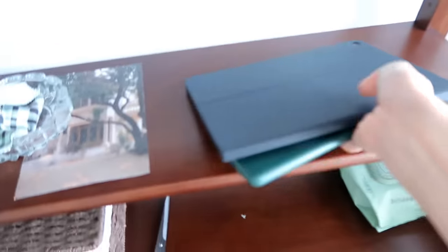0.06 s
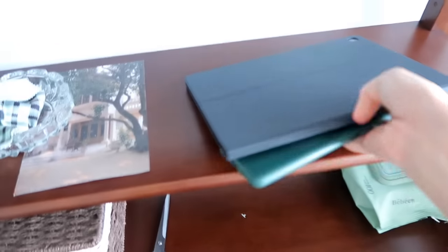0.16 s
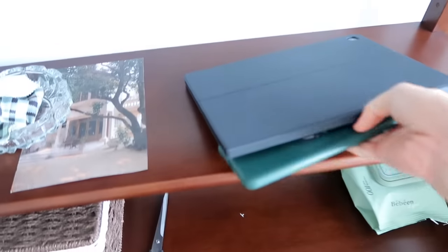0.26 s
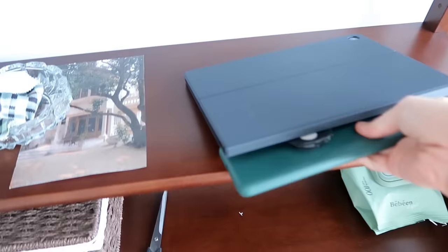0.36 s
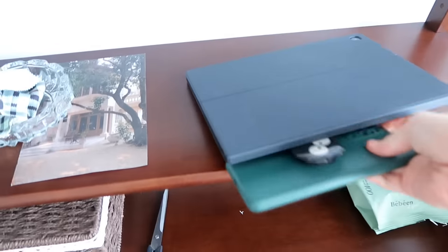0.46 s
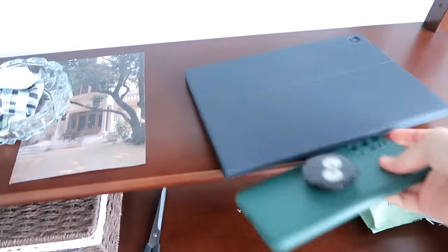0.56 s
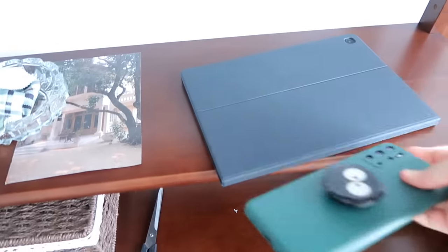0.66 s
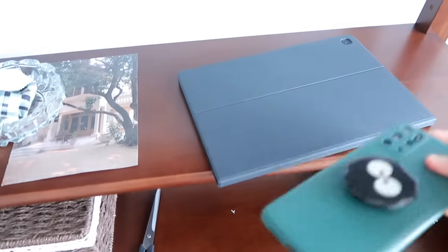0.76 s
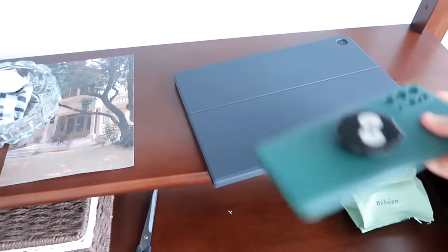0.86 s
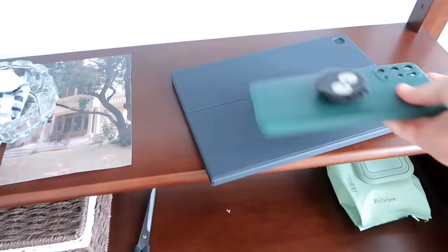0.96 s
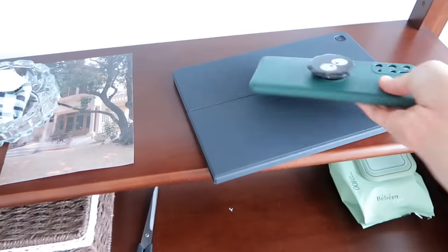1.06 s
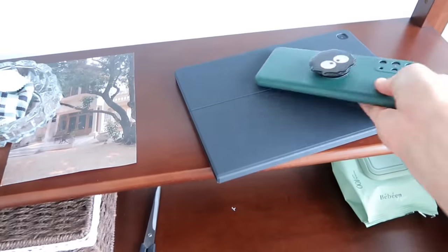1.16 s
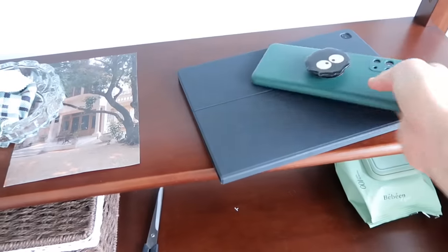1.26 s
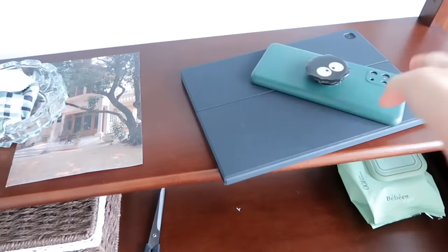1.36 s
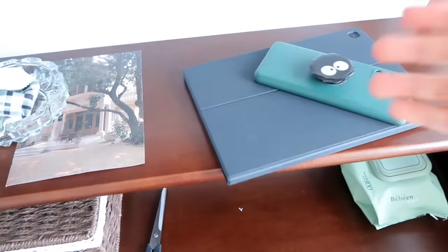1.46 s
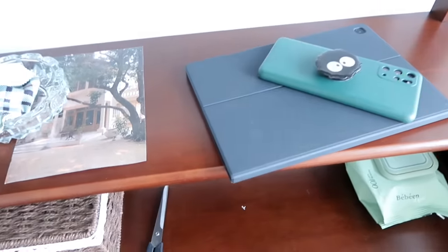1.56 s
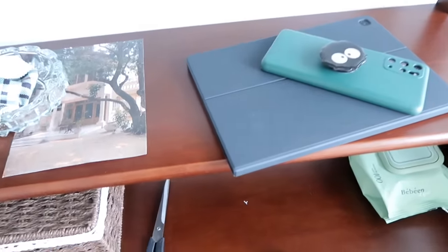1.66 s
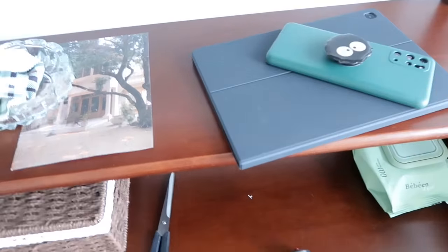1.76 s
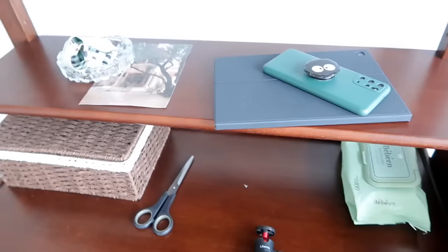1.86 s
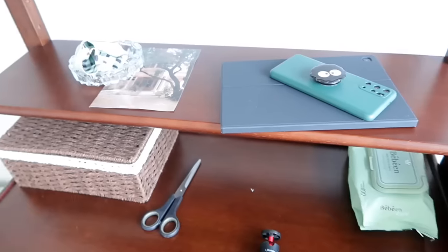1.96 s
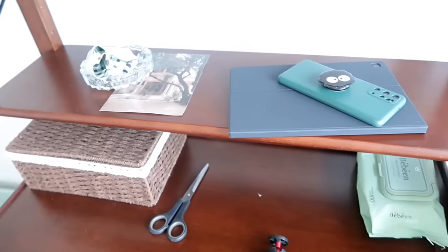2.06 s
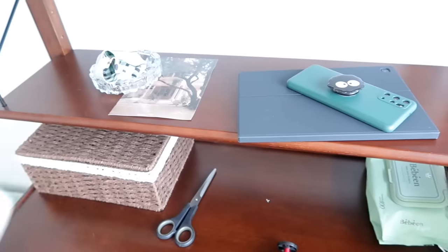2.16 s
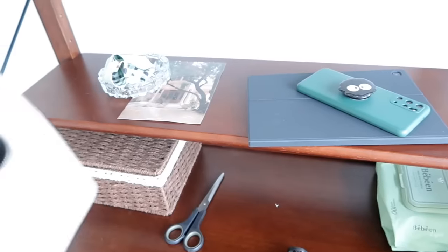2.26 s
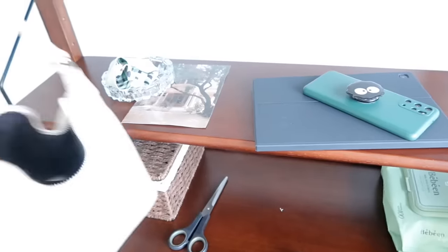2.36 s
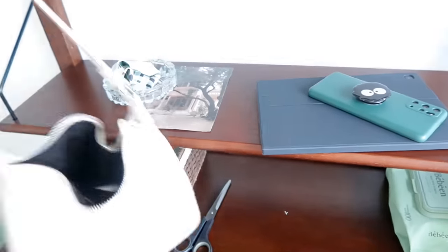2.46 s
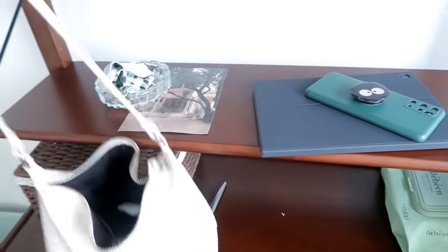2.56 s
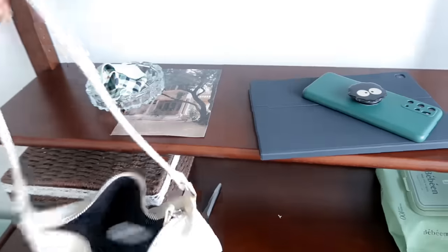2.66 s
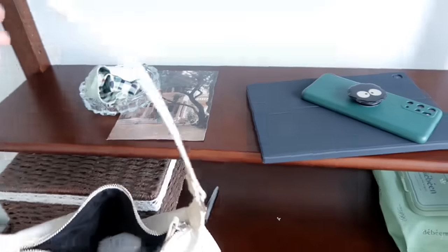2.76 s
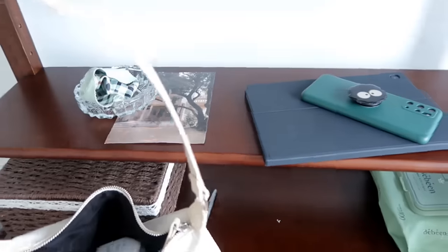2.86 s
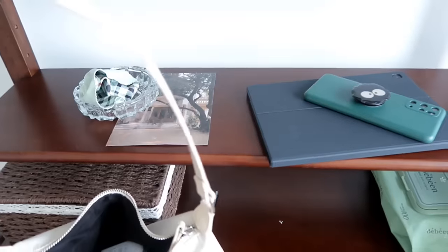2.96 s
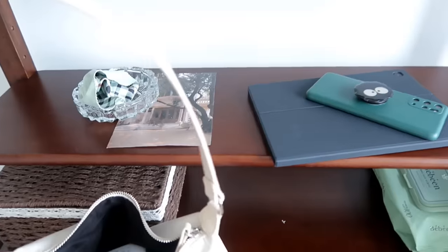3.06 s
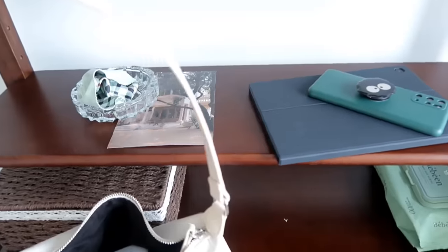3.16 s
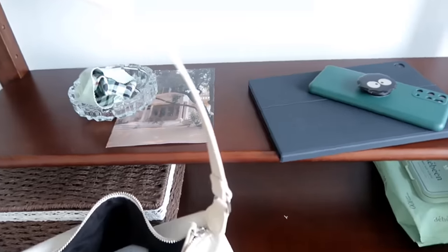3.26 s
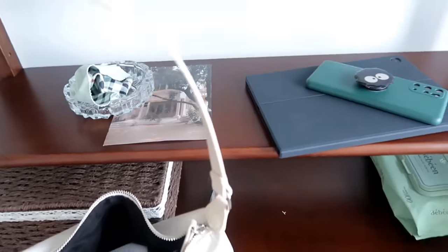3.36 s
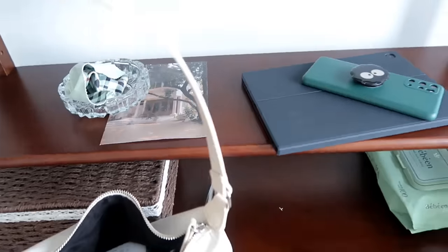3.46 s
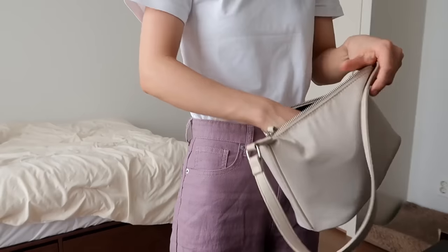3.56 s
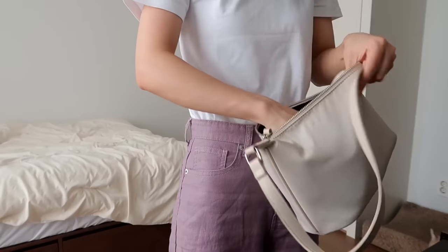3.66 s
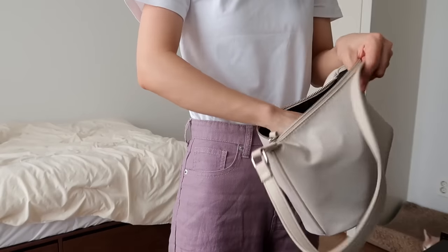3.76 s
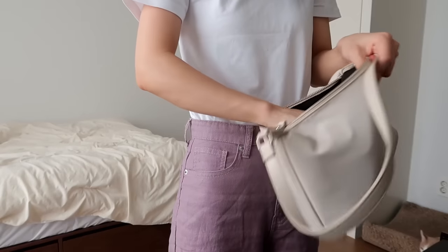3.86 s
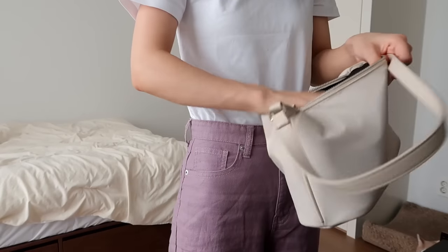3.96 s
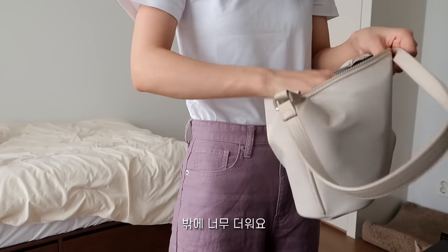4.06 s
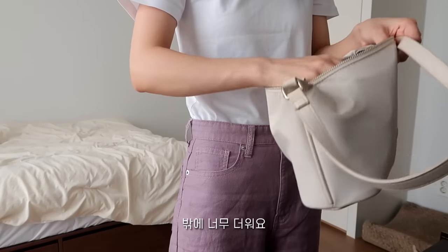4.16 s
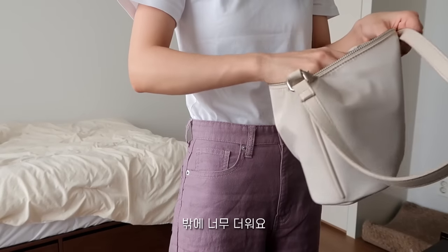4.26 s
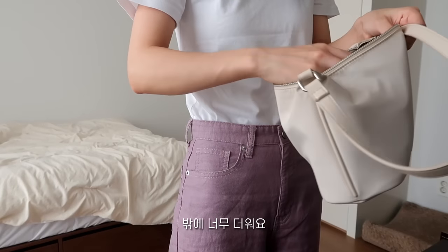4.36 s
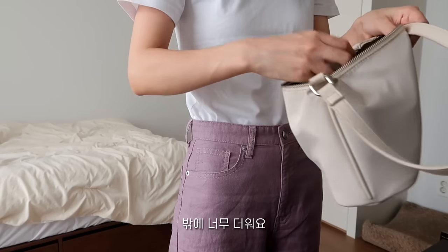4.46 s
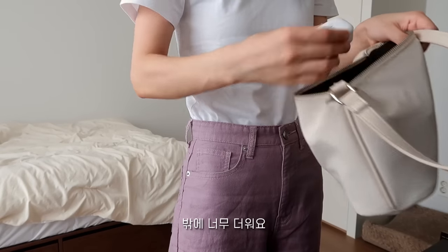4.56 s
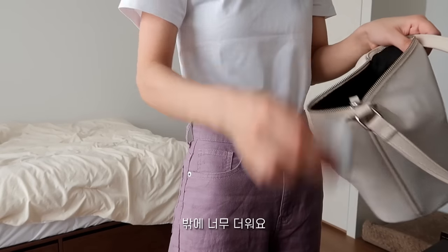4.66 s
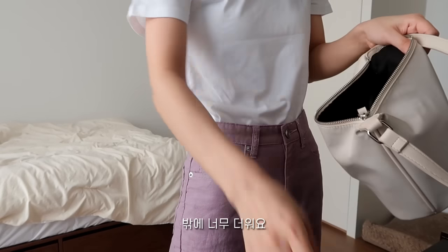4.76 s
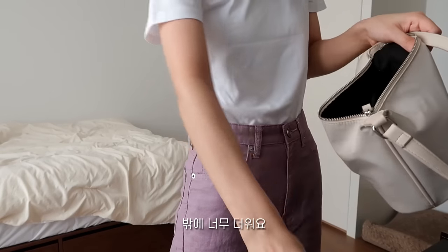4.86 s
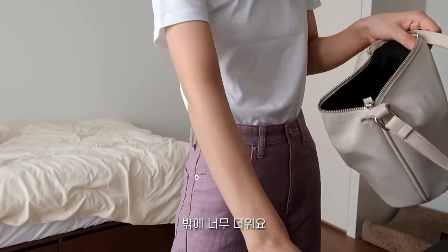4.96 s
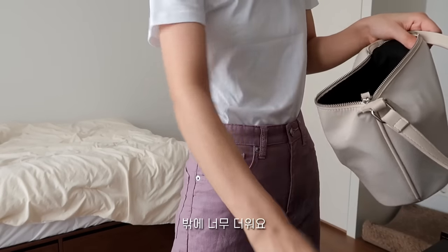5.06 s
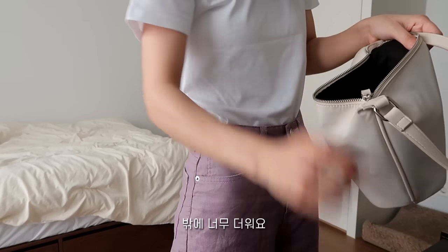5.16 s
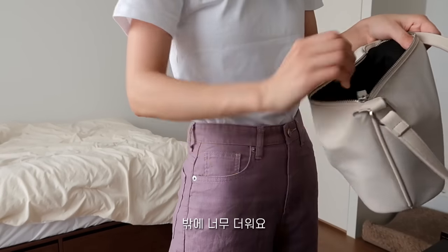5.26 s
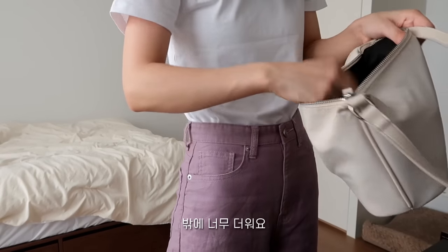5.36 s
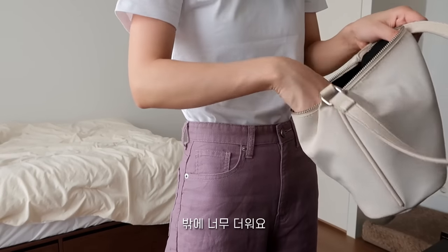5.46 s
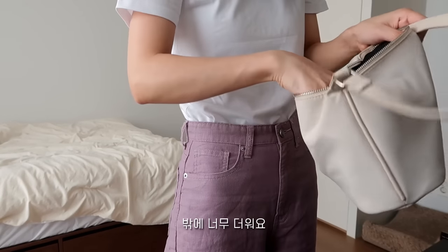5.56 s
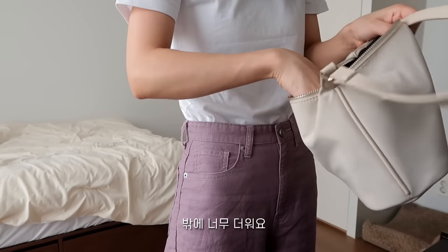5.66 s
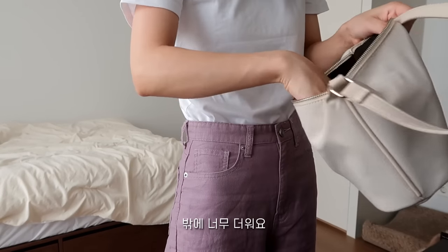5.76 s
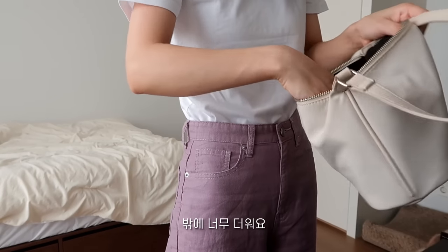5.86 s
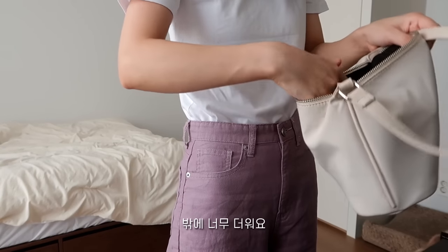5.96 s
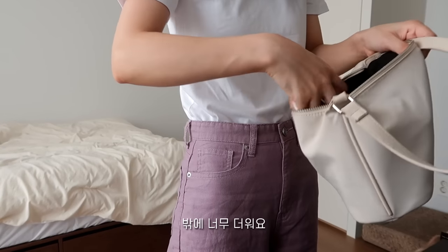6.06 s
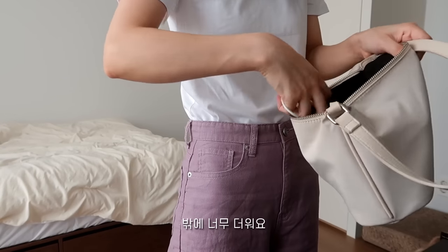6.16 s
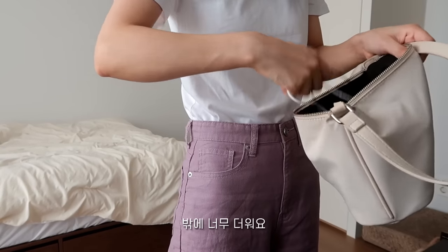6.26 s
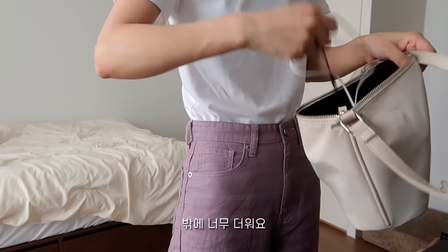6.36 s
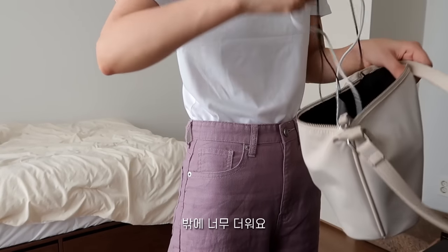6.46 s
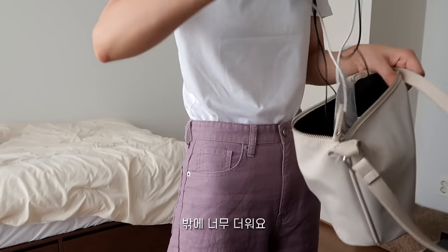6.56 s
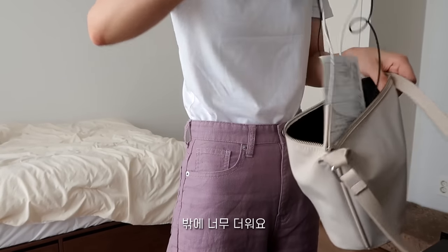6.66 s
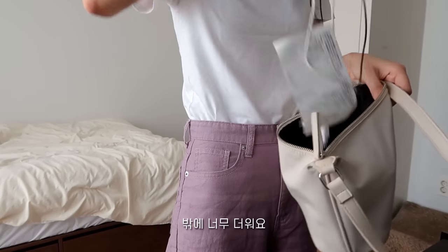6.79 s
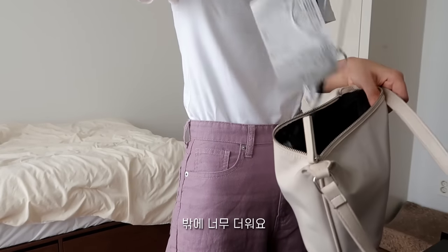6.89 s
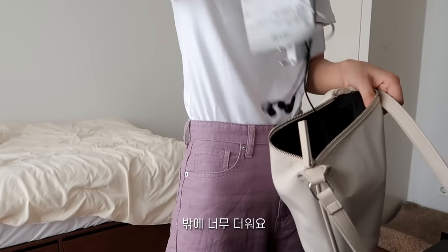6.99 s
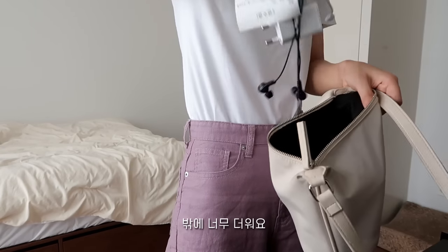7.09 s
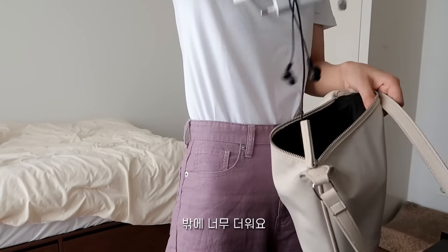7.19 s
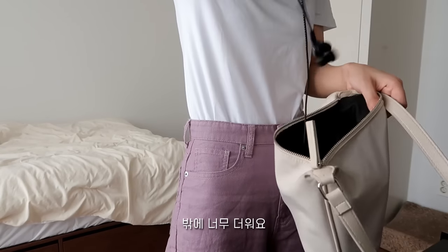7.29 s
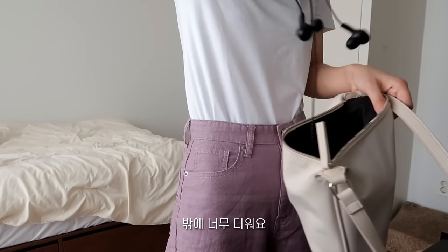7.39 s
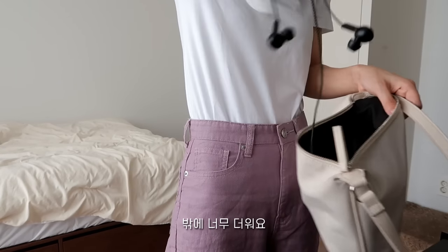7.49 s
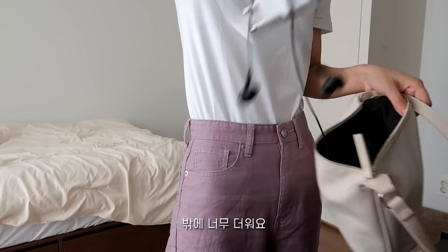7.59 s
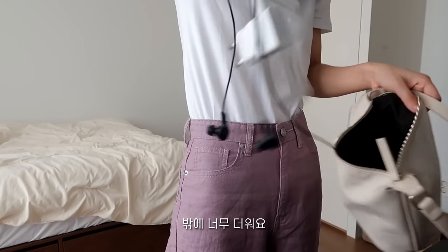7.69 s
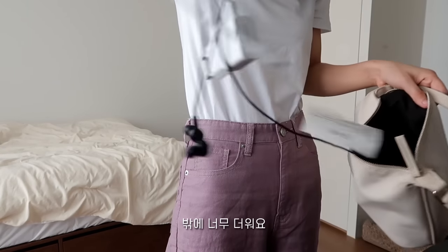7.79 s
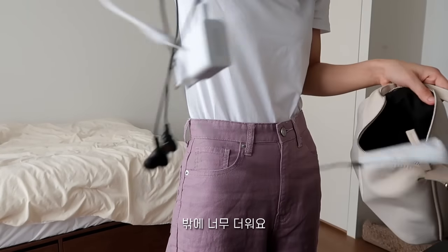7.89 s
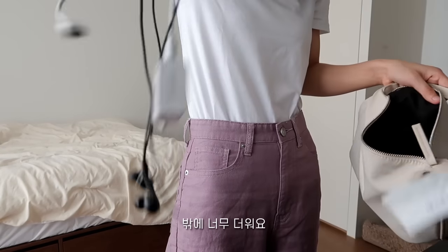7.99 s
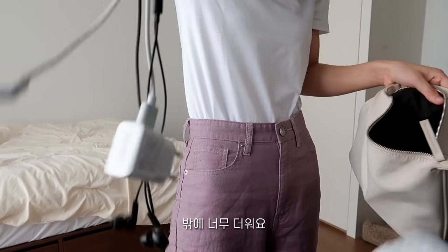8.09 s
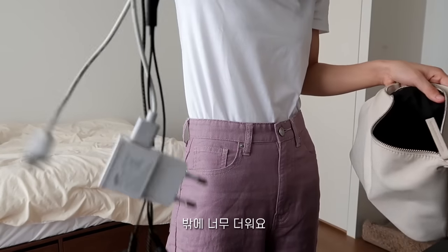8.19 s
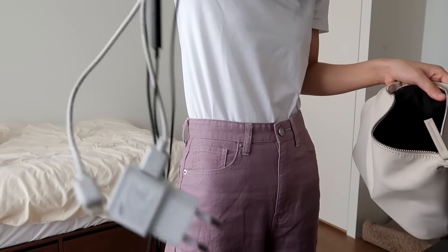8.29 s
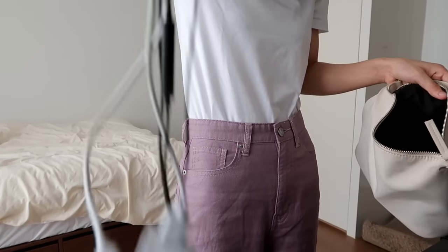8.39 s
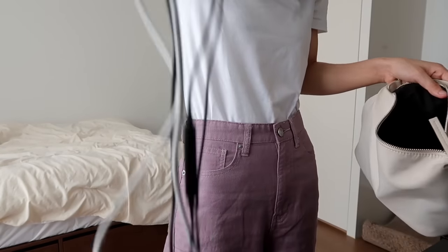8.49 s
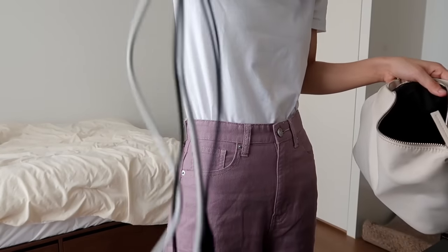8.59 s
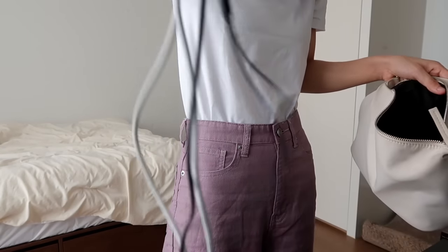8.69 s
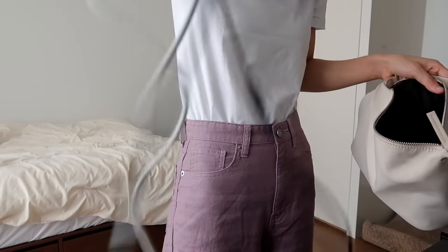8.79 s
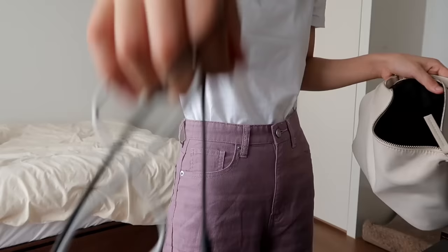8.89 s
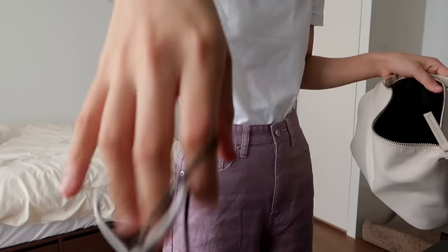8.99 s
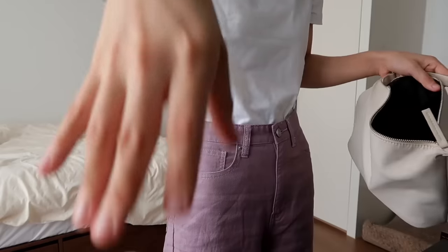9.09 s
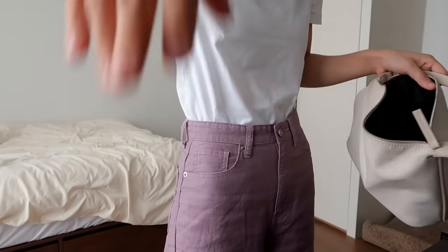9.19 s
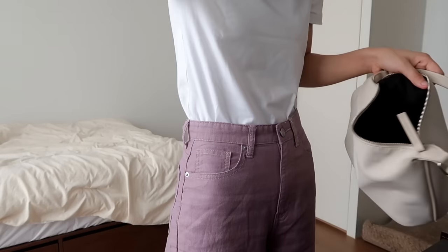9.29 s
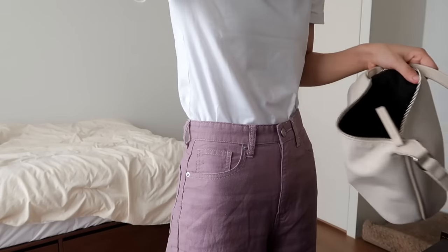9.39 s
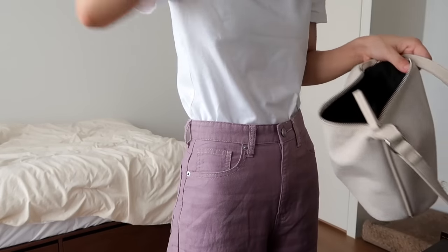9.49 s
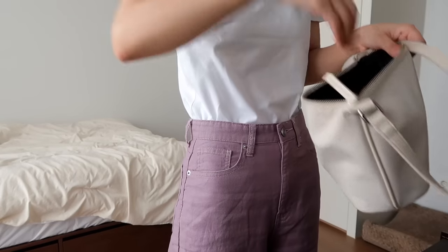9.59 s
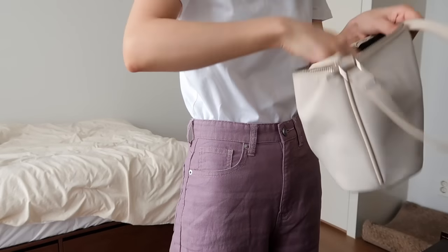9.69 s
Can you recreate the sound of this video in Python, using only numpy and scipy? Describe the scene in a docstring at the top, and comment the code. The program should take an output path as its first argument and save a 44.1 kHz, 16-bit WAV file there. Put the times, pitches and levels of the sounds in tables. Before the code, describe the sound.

Soft room hush with short, dry reflections. First a faint bump, a quick squeak and a tumbling knock on a hollow wooden shelf, then a second solid knock. A bag bumps and rustles with sparse small ticks inside. Cables crunch and scrape as they are pulled out, and hard plastic plugs clack loudly near the microphones, with dense knocks and drags toward the end.

```python
"""A quiet, small furnished bedroom, heard at a phone's two microphone ports over a low hush and a thin whine.
A phone case squeaks by stick-slip from under a tablet, which drops on a wooden shelf. Things knock on the shelf,
tick in a cloth bag, and plastic chargers on cables clack: each blow sums damped modes, ring, snap and crack.
Cloth and cables rustle as band noise in grains, scrapes sing in gliding resonances, and decaying noise
convolved with the near sounds gives the room's answer."""
import sys
import numpy as np
from scipy import signal
from scipy.fft import rfft, irfft
from scipy.io import wavfile
from scipy.ndimage import uniform_filter1d, map_coordinates

SR = 44100
rng = np.random.default_rng(int(sys.argv[2]) if len(sys.argv) > 2 else 0)


def transcribe(u):
    """Save the signal u as a 16-bit wav file named by the first command-line argument.

    u: samples, shape (n,) or (channels, n), limited to [-1, 1]; the rate is SR.
    q: integer samples, one column per channel.
    """
    v = np.clip(np.atleast_2d(u).T, -1, 1)
    q = np.round(v * 32767).astype(np.int16)
    wavfile.write(sys.argv[1], SR, q)


N = 429534

# Hush spectrum, relative: [f/Hz, density/dB per Hz]
HUSH_SPECTRUM = [(12, -39.5), (20, -16), (59, -2), (144, -4), (202, -7.5), (238, -9), (382, -11.5),
                 (427, -10), (534, -19), (614, -17.5), (1820, -24), (2270, -24.5), (11700, -41.5),
                 (13500, -40.5), (15500, -59.5)]
# Stereo difference of the hush: [f/Hz, side minus mid/dB]
HUSH_SIDE = [(60, -19.5), (110, -15.5), (200, -3.5), (380, 0), (700, -0.5), (1290, -0.5), (2380, -2.5),
             (4400, 1), (8120, -3.5), (15000, 6)]
# Course of the hush: [t/s, level/dB]
HUSH_LEVEL = [(0, -45), (.5, -51.5), (1.9, -52.5), (7.7, -52), (8.2, -51.5), (8.3, -56), (8.7, -56.5),
              (9, -62.5), (9.74, -54.5)]
# Electric whine where the hush has its median level: [f/Hz, level/dB]
WHINE = [(13006, -84)]

# Reverberation time by octave: [f/Hz, t60/s]
ROOM_T60 = [(125, 0.87), (250, 0.07), (500, 0.36), (1000, 0.31), (2000, 0.22), (4000, 0.16), (8000, 0.16)]
# Echo against the direct sound, before the room's colour: [f/Hz, level/dB]
ROOM_LEVEL = [(125, -15.5), (500, -5.5), (2000, -7), (8000, -5.5)]
# Stereo difference of the echo: [f/Hz, side minus mid/dB]
ROOM_SIDE = [(125, -29.5), (1000, -18.5), (4000, -5), (12000, 16)]
# Shelves and hollows nearby favour some bands of the echo: [f/Hz, level/dB]
ROOM_COLOUR = [(330, 1.5), (432, 4), (600, 0), (1050, 1), (1700, -0.5), (2350, 2), (3000, -2), (6000, 2.5)]
BLUR_S = .0005  # scale of the random delay in the echo
CHARGER_WET_DB, SQUEAK_WET_DB = -1.5, -5  # closer to the phone, so less of the room
# Direction of the near sound: [t/s, lag of left/samples, left minus right/dB]
SIDEWAYS = [(0, .5, 0), (3.3, .5, .6), (3.5, 1.1, -.6), (6.5, 1.4, -1), (8, .8, -.5), (9.74, .6, -.3)]
TOP_HZ = 15500

# Strokes of cloth and cables: [start t/s, hold t/s, level/dB, dull share/dB, bright share/dB]
RUSTLE = [(0, 0.011, -68, 26, -22), (0.01, 0.25, -72.5, -11, 10.5), (.2, 0.16, -76, 16, -3),
          (.55, 0.13, -67, 11, -1), (1.426, 0.022, -54.5, -2, -7), (2.65, 0.028, -68, 22, -16),
          (2.75, 0.04, -50, 6, 0), (3.63, 0.0068, -45, 8.5, -7), (3.76, 0.14, -51, 6, -5),
          (4.07, 0.035, -53, 1, -4), (4.2, 0.34, -66, 3, -1), (5.55, 0.06, -53.5, 7, -4.5),
          (5.83, 0.095, -53, 0, -3), (6.01, 0.19, -49, 3.5, -6.5), (6.35, 0.012, -52, 3, -5),
          (6.47, 0.057, -55.5, -1, 3), (7.12, 0.15, -59, 8.5, -3), (7.59, 0.077, -62, 3, -1.5),
          (7.78, .03, -91, 14, -10), (8.3, 0.082, -56.5, 9, 5.5), (8.476, 0.012, -69.5, -7.5, 9),
          (8.66, 0.096, -54.5, 8.5, -5), (9.28, 0.026, -48.5, 5, -12), (9.36, 0.075, -57.5, 20, -2)]
RUSTLE_RISE_DB_S, RUSTLE_FALL_DB_S = 305.5, 189
# Harder drags, leather and cables crunching:
# [start t/s, hold t/s, level/dB, dull share/dB, bright share/dB, fall/dB per s]
CRUNCH = [(.638, 0.015, -46.5, -9, 2.5, 300), (.745, 0.04, -35.5, 14.5, -23, 198),
          (1.525, 0.0065, -50, -4, -10, 252), (2.8, 0.016, -26.5, 3, -17, 200),
          (2.895, 0.028, -34, 5.5, -32, 190), (3.548, 0.02, -44, 0, -5, 152),
          (5.105, 0.0081, -49, -4, 6, 259), (6.545, 0.029, -38.5, -10.5, -1.5, 202),
          (6.585, 0.098, -37.5, 1.5, -3.5, 170), (6.78, 0.022, -43, 2, 0, 198),
          (6.88, 0.06, -34, -5, -5, 298), (7.0, 0.017, -42, 2, -1, 400),
          (7.278, 0.11, -45.5, -16, -0.5, 1500), (8.015, .01, -51, -12, 7, 397.5),
          (8.24, 0.027, -32.5, 8, -24, 252.5), (8.8, 0.098, -32.5, -5, -22, 251),
          (8.92, 0.15, -43, 5.5, -15, 200), (9.145, 0.0085, -44, -4, -1, 222.5),
          (9.445, 0.075, -35, 5, -12, 248), (9.53, 0.072, -59.5, 17.5, -6, 201),
          (9.6, 0.054, -56.5, 0, -18, 200)]
CRUNCH_RISE_DB_S = 2507.5
# Spectrum of rustle and crunch: [f/Hz, level/dB per third octave]
CLOTH = [(190, -21.5), (380, -13), (540, -19), (760, -11), (1500, -11.5), (2150, -9.5), (3000, -9.5),
         (6000, -12), (12000, -28.5), (15000, -19.5)]

# Scrapes with one gliding resonance: [start t/s, hold t/s, level/dB, first f/Hz, last f/Hz, width/Hz]
SCRAPES = [(2.722, 0.017, -62, 4200, 4300, 300), (2.755, 0.021, -45, 3950, 3470, 500),
           (6.545, 0.069, -37.5, 958, 1243, 500), (6.57, 0.062, -47, 2296, 2500, 700),
           (6.61, .025, -40.5, 5470, 6020, 900), (7.31, .05, -37.5, 1916, 2402, 1320),
           (7.32, 0.017, -44.5, 4420, 4410, 600), (7.365, 0.023, -46, 4480, 5320, 1000)]
SCRAPE_RISE_DB_S, SCRAPE_FALL_DB_S, SCRAPE_GRIT_DB = 900, 900, 2

# Case rubbing on the tablet, a row a squeak: [start t/s, hold t/s, level/dB]
SQUEAK = [(0.193, 0.064, -56), (0.411, 0.014, -53.5), (.592, 0.016, -50), (0.656, 0.01, -38),
          (0.677, 0.0097, -18.5), (0.69, 0.0049, -19), (0.702, 0.0058, -31), (0.721, 0.0053, -23)]
# Overtones of the squeak: [multiple of the slip rate, mean level/dB against the fundamental]
SQUEAK_OVERTONES = [(2, -22), (3, -18), (4, -28)]
SQUEAK_RISE_DB_S, SQUEAK_FALL_DB_S = 4002, 2200
SLIP_HZ, SLIP_HZ_PER_DB = 987, 2.6  # mean slip rate near 0 dB; harder pressing slips faster

# Blows on the shelf:
# [t/s, ring peak level/dB, ring f/Hz, thud peak level/dB, snap peak level/dB, crack peak level/dB]
SHELF_KNOCKS = [(.004, -36, 800, -27, -66, -60), (.201, -40, 890, -33.5, -54, -49),
                (.24, -40, 930, -38.5, -53, -62), (.721, -22, 1570, -34, -35, -43),
                (.741, -12, 1050, -23, -22, -35), (.752, -19, 774, -13.5, -31, -42),
                (.757, -12, 1690, -13, -40, -45), (.77, -15, 700, -35, -20, -52),
                (.813, -19, 219, -19.5, -44, -33), (.822, -12, 1290, -15, -16, -25),
                (.834, -15.5, 877, -16.5, -42, -49), (.847, -10.5, 690, -13.5, -31, -47),
                (.878, -28, 1020, -18.5, -41, -50), (1.274, -24.5, 940, -16.5, -33.5, -42),
                (1.446, -56, 930, -24.5, -44, -60), (1.515, -6.5, 995, -15, -13, -31),
                (1.524, -13, 605, -14, -26, -51), (1.531, -11.5, 890, -12.5, -40, -54),
                (1.545, -16.5, 644, -43, -47, -62), (1.576, -29, 1020, -28.5, -50, -57),
                (1.811, -36.5, 1600, -41, -66.5, -69), (1.828, -37.5, 770, -53, -41, -48)]
# Blows in the cloth bag, same columns:
# [t/s, ring peak level/dB, ring f/Hz, thud peak level/dB, snap peak level/dB, crack peak level/dB]
BAG_TICKS = [(2.653, -46, 1100, -34.5, -39, -49), (2.788, -20.5, 1704, -25.5, -31, -32),
             (2.798, -11.5, 1105, -30, -10.5, -32), (2.805, -11.5, 1280, -32, -22, -45),
             (2.822, -16.5, 2310, -20.5, -27, -51), (2.884, -21, 1800, -46, -25, -57),
             (2.887, -8.5, 1100, -35, -39, -61), (2.92, -17, 1120, -26, -44, -65),
             (3.543, -32, 1940, -38, -34, -41), (3.556, -32, 1620, -48, -48, -50),
             (3.577, -31.5, 882, -59, -43, -53), (3.621, -26, 1790, -45, -31, -44),
             (3.733, -38, 1770, -60, -55, -60), (3.755, -38.5, 895, -38.5, -55, -61),
             (3.766, -32, 1730, -39, -50, -58), (3.803, -35.5, 890, -46, -40, -43.5),
             (3.864, -33, 1250, -37, -33.5, -51), (3.925, -30, 1360, -54, -33, -64),
             (4.021, -32, 1640, -52, -56, -66), (5.095, -18.5, 1073, -16, -23, -17.5),
             (5.103, -32, 790, -17.5, -41, -41), (5.116, -29, 1000, -28, -42, -33),
             (5.551, -36, 1960, -39, -55, -58), (5.648, -24, 1860, -65, -55, -62),
             (5.823, -38, 1190, -36.5, -51, -69), (5.882, -33.5, 2040, -43, -37, -48),
             (6.01, -34, 804, -41.5, -56, -63), (6.096, -31, 1870, -36, -49, -42),
             (6.17, -32.5, 2340, -41.5, -36, -36), (6.322, -44, 1240, -37, -46, -66),
             (6.35, -40.5, 840, -34, -56, -49), (6.477, -29.5, 2880, -47, -35.5, -38.5),
             (6.525, -30, 895, -45, -48, -60), (6.532, -34.5, 990, -40, -40, -60),
             (6.551, -36, 1080, -44, -34, -33), (6.641, -21, 1160, -53, -44, -26.5),
             (6.71, -29, 1750, -56, -27, -20.5), (6.87, -28, 897, -42, -16, -23),
             (6.938, -41, 2970, -51, -35, -14), (6.958, -26, 2170, -38, -22, -32),
             (7.006, -37, 1130, -26.5, -40, -52), (7.086, -37.5, 1120, -34.5, -31, -60),
             (7.145, -37.5, 970, -40, -37, -64), (7.163, -38, 1300, -38.5, -36, -64),
             (7.468, -33, 2070, -66, -53, -64), (7.529, -50, 3000, -65, -43, -57),
             (7.587, -30.5, 970, -56, -40.5, -65), (7.788, -37, 940, -33, -68, -71)]
# Blows of the chargers, same columns:
# [t/s, ring peak level/dB, ring f/Hz, thud peak level/dB, snap peak level/dB, crack peak level/dB]
CHARGER_CLACKS = [(4.797, -14, 933, -33, -22.5, -29), (7.833, -50, 1047, -56, -47, -43),
                  (7.918, -19.5, 910, -32, -10, -27), (8.027, -26.5, 1130, -26.5, -22, -32.5),
                  (8.17, -36, 3480, -58, -63, -40), (8.231, -3.5, 3285, -14.5, -2.5, -14.5),
                  (8.233, -5.5, 974, -24.5, -23, -40), (8.284, -9.5, 2360, -39, -40, -29),
                  (8.294, -32, 1930, -33, -41, -49), (8.344, -43, 770, -58, -45, -36),
                  (8.378, -36, 2900, -59, -50, -42), (8.42, -36, 2230, -40, -32, -48),
                  (8.477, -50, 1050, -55, -41, -37.5), (8.592, -44, 2960, -67, -54, -65),
                  (8.648, -34.5, 940, -37, -39, -65), (8.687, -33, 2930, -61, -38, -39),
                  (8.706, -28, 1020, -38.5, -28.5, -43), (8.785, -5, 866, -10, -13, -36),
                  (8.794, -9, 1250, -14.5, -9.5, -49), (8.812, -19.5, 2430, -38, -38, -52),
                  (8.833, -23, 2400, -33, -36, -55), (8.845, -14.5, 1125, -14, -22, -52),
                  (8.873, -21, 1220, -20.5, -22, -48), (8.898, -13.5, 2540, -7.5, -14.5, -40),
                  (8.909, -7, 4030, -6.5, -18, -32), (8.937, -14, 1210, -26, -30, -40),
                  (8.965, -19, 1100, -20.5, -32, -48), (8.929, -12.5, 1130, -4, -21, -31),
                  (8.949, -7.5, 1033, -8.5, -19, -30), (8.986, -16, 1210, -10.5, -20, -54),
                  (9.003, -17, 1100, -17.5, -30, -52), (9.029, -27, 1250, -18, -28.5, -45),
                  (9.134, -39, 900, -46, -35.5, -52), (9.208, -33.5, 2200, -37.5, -49, -67),
                  (9.26, -34, 1110, -41.5, -49, -56), (9.277, -26.5, 980, -41.5, -30.5, -49),
                  (9.287, -24, 996, -25.5, -32.5, -48), (9.33, -30.5, 824, -43.5, -46, -57),
                  (9.376, -33, 597, -19, -27.5, -43), (9.4, -31, 517, -23, -42, -57),
                  (9.435, -15, 1226, -17, -16, -38), (9.451, -12.5, 890, -32, -20, -50),
                  (9.464, -18.5, 3840, -16, -19, -52), (9.471, -23, 3900, -31, -40, -50),
                  (9.478, -19, 1260, -25.5, -21, -49), (9.502, -13.5, 850, -16, -30, -47),
                  (9.517, -17.5, 1035, -19, -19, -26.5), (9.533, -35, 1200, -27, -37, -43.5),
                  (9.576, -30, 700, -55, -49, -55), (9.618, -35, 1100, -35.5, -52, -64)]
# Modes of the shelf, relative levels: [f/Hz, level/dB, t60/s]
SHELF_MODES = [(57.5, -20, .2), (103.2, -11.5, 0.69), (111.8, -10.5, 1.27), (127.1, -7, 1.34),
               (145, -6, 0.18), (176.7, 2, 0.21), (230.7, -15.5, .9), (249.4, 1.5, 0.28), (301, 2, 0.075),
               (348.6, 7, 0.091), (491.6, -2.5, 0.18), (601, -14, 0.16), (750, 5, 0.061),
               (1111, -5.5, 0.073)]
# Modes of the bag, relative levels: [f/Hz, level/dB, t60/s]
BAG_MODES = [(151.3, 3.3, 0.45), (229.3, 11.6, 0.1), (281, 1.4, 0.34), (424.7, 12.7, 0.13),
             (554, 3.5, 0.077), (647, 2, 0.064), (870, 2, 0.093)]
# Modes of the charger bodies, relative levels: [f/Hz, level/dB, t60/s]
CHARGER_MODES = [(148.4, -17.5, 0.35), (248, -32, 0.12), (321.7, -10.5, 0.25), (402, -4.5, 0.066),
                 (434.6, 8, 0.13), (528, 3, 0.067), (631, -2, 0.12), (957, 0.5, 0.046), (1237, -0.5, 0.08),
                 (2310, -14, 0.053)]
# Mean high tones of the hard shells that snap, f/Hz
SHELF_SNAP_HZ = (1880, 2440, 2960, 4130)
BAG_SNAP_HZ = (2193, 2630, 2900, 3980)
CHARGER_SNAP_HZ = (2206, 2530, 2846, 3270)
# Shared by all blows on a thing: ring (below its knee) and snap t60/s, rise of the push/s, crack decay/s,
# crack band/Hz, noise added to ring and snap tones (factors), first buzz of loose parts (share), lowest thud f/Hz
SHELF = dict(ring_t60=0.041, snap_t60=0.022, push_s=0.0005, crack_s=0.0065, crack_hz=(3480, 9200),
             spread=4.8, snap_spread=5.2, rumble=0.62, low_hz=70)
BAG = dict(ring_t60=0.042, snap_t60=0.02, push_s=0.0011, crack_s=0.0015, crack_hz=(3250, 9400),
           spread=2.76, snap_spread=6.2, rumble=0.58, low_hz=92)
CHARGER = dict(ring_t60=0.022, snap_t60=0.023, push_s=0.00054, crack_s=0.0042, crack_hz=(3840, 11700),
               spread=2, snap_spread=3.1, rumble=0.19, low_hz=130)
RING_KNEE_HZ = 1400  # higher rings die sooner
SHELF_END_S, SHELF_END_FALL_DB_S = 1.86, 598  # the shelf's hum ends abruptly

def undb(db):
    """Amplitude ratio: 20 dB is a factor of ten."""
    return 10 ** (np.asarray(db) / 20)


def curve(table):
    """Linear interpolation in time: each value column at every sample."""
    s, *columns = np.transpose(table)
    return [np.interp(np.arange(N) / SR, s, c) for c in columns]


def across(table, hz):
    """Logarithmic frequency scale: a (f/Hz, value) table read at hz."""
    f, v = np.transpose(table)
    return np.interp(np.log(np.maximum(hz, 1)), np.log(f), v)


def colour(x, table):
    """Linear filtering: multiply the spectrum by a (f/Hz, level/dB) table."""
    n = x.shape[-1]
    hz = np.arange(n // 2 + 1) * SR / n
    return irfft(rfft(x) * undb(across(table, hz)), n)


def band(x, lo_hz, hi_hz):
    """Band-pass filtering."""
    sos = signal.butter(2, [lo_hz, hi_hz], "bandpass", fs=SR, output="sos")
    return signal.sosfilt(sos, x)


def unit(x):
    """Normalization of power: rms 1."""
    return x / np.sqrt(np.mean(x ** 2))


def walk(rate):
    """Slow random modulation: a new normal level each 1 / rate s, reached by a steady slew."""
    k = int(SR / rate)
    steps = np.repeat(rng.standard_normal(N // k + 1), k)
    return uniform_filter1d(steps, k)[:N]


def grains(count, length, top):
    """Granularity: exponentially distributed sizes up to top, each held for length samples."""
    sizes = rng.exponential(size=count // length + 1).clip(0, top)
    return np.repeat(sizes, length)[:count]


def swell(start_s, held_s, level_db, rise_db_s, fall_db_s):
    """Exponential growth and decay: the gain rises, holds and falls, both slopes steady in dB."""
    t = np.arange(N) / SR
    before = (start_s - t).clip(0)
    after = (t - start_s - max(held_s, 0)).clip(0)
    return undb(level_db - rise_db_s * before - fall_db_s * after)


def hush():
    """Broadband noise of drifting level, lower after about 8.2 s, with wavering bass and a sinusoidal whine."""
    mid, side = colour(rng.standard_normal((2, N)), HUSH_SPECTRUM)
    tone = (mid + colour(side, HUSH_SIDE) * np.array([[1], [-1]])) / np.std(mid)
    tone = tone + (undb(2.0 * walk(7.6)) - 1) * band(tone, 24, 500)
    level = undb(curve(HUSH_LEVEL)[0])
    t = np.arange(N) / SR
    whine = sum(undb(db) * np.sqrt(2) * np.sin(2 * np.pi * hz * t) for hz, db in WHINE)
    return tone * level + whine * level / np.median(level)


def room_echo():
    """Exponential reverberant decay by octave: the ports share the bass and differ in the treble."""
    t = np.arange(int(.7 * SR)) / SR
    echo = 0
    for hz, t60 in ROOM_T60:
        mid, side = band(rng.standard_normal((2, len(t))), hz / np.sqrt(2), hz * np.sqrt(2))
        stereo = mid + undb(across(ROOM_SIDE, hz)) * side * np.array([[1], [-1]])
        tail = stereo * np.exp(-t * np.log(1000) / t60)
        # first walls answer after a few milliseconds
        tail = tail * np.clip(t / 0.0031 - .4, 0, 1)
        # each band keeps its width's share of a flat response
        size = np.sqrt(np.sum(tail[0] ** 2) * SR / (np.sqrt(2) * hz))
        echo = echo + undb(across(ROOM_LEVEL, hz)) * tail / size
    return echo


def room(x):
    """Convolution with the room's echo, after randomly varying delay has blurred the tones."""
    echo = room_echo()
    # the walls hear each thing from other sides, where its tones blur into a broad band
    i = np.arange(N)
    blurred = sum(np.interp(i + BLUR_S * SR * walk(300), i, x) for _ in range(2))
    x = band(x, 20, 500) + band(blurred, 500, 16000) / np.sqrt(2)
    return signal.fftconvolve(colour(x, ROOM_COLOUR)[None], echo, axes=1)[:, :N]


def ports(x):
    """Time and level difference: a source to one side reaches one port later, at another level."""
    lag, pan_db = curve(SIDEWAYS)
    i = np.arange(N)
    sides = []
    for way in (1, -1):  # left, right
        delayed = map_coordinates(x, [i - way * lag / 2], order=3)
        sides.append(delayed * undb(way * pan_db / 2))
    return np.array(sides)


def rustle():
    """Granular friction noise: fibres catch and let go in flurries, over third-octave bands."""
    strokes = [(*row, RUSTLE_FALL_DB_S) for row in RUSTLE]
    dull = middle = bright = 0
    for rows, rise_db_s in ((strokes, RUSTLE_RISE_DB_S), (CRUNCH, CRUNCH_RISE_DB_S)):
        for start_s, held_s, level_db, dull_db, bright_db, fall_db_s in rows:
            gain = swell(start_s, held_s, level_db, rise_db_s, fall_db_s)
            dull = dull + undb(dull_db) * gain
            middle = middle + gain
            bright = bright + undb(bright_db) * gain
    out = 0
    # a fibre letting go clicks in all upper bands at once
    click_db = 3.2 * grains(N, 40, 3.5)
    for hz in 190 * 2 ** np.arange(0, 6.2, 1 / 3):
        size_db = grains(N, 20, 5) + click_db * (hz > 1000)
        noise = rng.standard_normal(N) * undb(size_db)
        fold = unit(band(noise, hz / 2 ** (1 / 6), hz * 2 ** (1 / 6)))
        patch_db = 3.5 * walk(70)
        gain = dull if hz < 700 else bright if hz > 3000 else middle
        out = out + undb(across(CLOTH, hz) + patch_db) * fold * gain
    return out * undb(2.0 * walk(45))


def scrapes():
    """Forced resonance: tiny uneven catches stir one resonance, which glides as the contact moves."""
    t = np.arange(N) / SR
    out = np.zeros(N)
    for start_s, held_s, level_db, first_hz, last_hz, width_hz in SCRAPES:
        near = slice(int((start_s - .1) * SR), int((start_s + held_s + .1) * SR))
        count = len(t[near])
        grit = undb(SCRAPE_GRIT_DB * grains(count, 50, 4))  # catches about a millisecond apart
        # low-pass noise on two quadrature carriers makes a band of noise round the gliding pitch
        low_pass = signal.butter(2, width_hz / 2, fs=SR, output="sos")
        sway = signal.sosfilt(low_pass, rng.standard_normal((2, count)) * grit)
        hz = np.interp(t[near], [start_s, start_s + held_s], [first_hz, last_hz])
        phase = 2 * np.pi * np.cumsum(hz) / SR
        gain = swell(start_s, held_s, level_db, SCRAPE_RISE_DB_S, SCRAPE_FALL_DB_S)[near]
        out[near] += gain * unit(sway[0] * np.cos(phase) + sway[1] * np.sin(phase))
    return out


def squeak():
    """Stick-slip of rubber on rubber: a wavering tone, unsteady overtones and scrape noise."""
    gain = sum(swell(*row, SQUEAK_RISE_DB_S, SQUEAK_FALL_DB_S) for row in SQUEAK)
    hz = SLIP_HZ + SLIP_HZ_PER_DB * 20 * np.log10(gain + 0.00093)  # the offset bounds the lowest pitch
    phase = 2 * np.pi * np.cumsum(hz * (1 + .032 * walk(400))) / SR
    tone = np.sin(phase)
    for multiple, level_db in SQUEAK_OVERTONES:
        tone = tone + undb(level_db + 3.2 * walk(148.7)) * np.sin(multiple * phase)
    scrape = undb(-21) * unit(band(rng.standard_normal(N), 1160, 3980))
    return (np.sqrt(2) * tone + scrape) * gain


def body_thud(body, t, push_s, rumble, low_hz):
    """Modal superposition: a push excites the damped modes of the body."""
    # every blow lands elsewhere: new shares over the modes, which set off nearly in step
    count = len(body)
    share = undb(2.5 * rng.standard_normal(count)) * np.exp(.6j * rng.standard_normal(count))
    # load and grip shift the body's pitch a little
    rung = np.interp(t * (1 + .02 * rng.standard_normal()), t, (share @ body).imag)
    # loose parts buzz along at first, so the early ring is uneven
    buzz = 1 + rumble * unit(band(rng.standard_normal(len(t)), 23.0, 127.5)) * np.exp(-t / 0.5)
    return band(rung * buzz * (1 - np.exp(-t / push_s)), low_hz, 4000)


def struck_ring(f, t, rise, ring_t60, spread):
    """Damped oscillation of the struck thing: noise round a tone stands for a cluster of close tones."""
    decay = np.exp(-t * np.log(1000) * np.sqrt(max(f / RING_KNEE_HZ, 1)) / ring_t60)
    cluster = np.sin(2 * np.pi * f * t) + spread * rng.standard_normal(len(t))
    return band(rise * decay * cluster, f / 1.83, f * 1.363)


def shell_snap(snap_hz, t, rise, snap_t60, snap_spread):
    """Damped shell resonances: several high tones with noise round them."""
    count = len(snap_hz)
    mix = undb(2 * rng.standard_normal(count)) * np.exp(1j * rng.uniform(0, 2 * np.pi, count))
    # the grip and the angle shift the shell's tones a little each time
    hz = snap_hz * (1 + .02 * rng.standard_normal(count))
    shell = np.exp(2j * np.pi * np.outer(hz, t))
    decay = np.exp(-t * np.log(1000) / snap_t60)
    tones = (mix @ shell).imag + snap_spread * rng.standard_normal(len(t))
    return band(band(rise * decay * tones, 1400, 4900), 1400, 4900)


def contact_crack(t, rise, crack_s, crack_hz):
    """Impulsive contact noise: a short, decaying high band."""
    return band(rng.standard_normal(len(t)) * np.exp(-t / crack_s) * np.sqrt(rise), *crack_hz)


def blows(events, modes, snap_hz, ring_t60, snap_t60, push_s, crack_s, crack_hz,
          spread, snap_spread, rumble, low_hz):
    """Impact excitation: each blow sums thud, ring, snap and crack, each set to its own peak."""
    t = np.arange(SR) / SR
    short = t[:SR // 6]
    rise = 1 - np.exp(-short / push_s)
    hz, db, t60 = np.transpose(modes)[:, :, None]
    body = undb(db) * np.exp(t * (2j * np.pi * hz - np.log(1000) / t60))
    out = np.zeros(N + len(t))
    for s, ring_peak, f, thud_peak, snap_peak, crack_peak in events:
        thud = body_thud(body, t, push_s, rumble, low_hz)
        ring = struck_ring(f, short, rise, ring_t60, spread)
        snap = shell_snap(np.array(snap_hz), short, rise, snap_t60, snap_spread)
        crack = contact_crack(short, rise, crack_s, crack_hz)
        parts = ((thud, thud_peak), (ring, ring_peak), (snap, snap_peak), (crack, crack_peak))
        i = int(s * SR)
        for part, peak_db in parts:
            out[i:i + len(part)] += undb(peak_db) * part / np.abs(part).max()
    return out[:N]


def scene():
    """Superposition of the direct field, the reverberant field and the background."""
    fade_out = swell(0, SHELF_END_S, 0, 0, SHELF_END_FALL_DB_S)
    shelf = blows(SHELF_KNOCKS, SHELF_MODES, SHELF_SNAP_HZ, **SHELF) * fade_out
    bag = blows(BAG_TICKS, BAG_MODES, BAG_SNAP_HZ, **BAG)
    chargers = blows(CHARGER_CLACKS, CHARGER_MODES, CHARGER_SNAP_HZ, **CHARGER)
    rubbing = squeak()
    rest = shelf + bag + rustle() + scrapes()
    wet = rest + undb(CHARGER_WET_DB) * chargers + undb(SQUEAK_WET_DB) * rubbing
    return ports(rest + chargers + rubbing) + room(wet) + hush()


def record(dry):
    """Amplitude limiting and low-pass filtering: the phone clips at full scale and cuts the top."""
    low_pass = signal.ellip(8, .2, 70, TOP_HZ, fs=SR, output="sos")
    return signal.sosfilt(low_pass, np.clip(dry, -1, 1))


dry = scene()
out = record(dry)
transcribe(out)
```